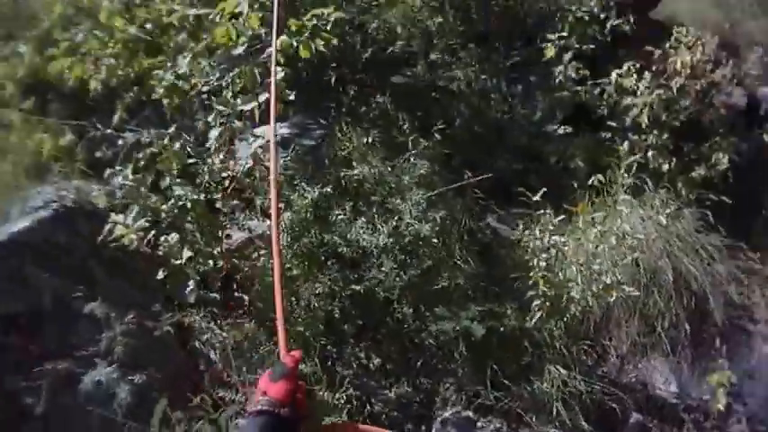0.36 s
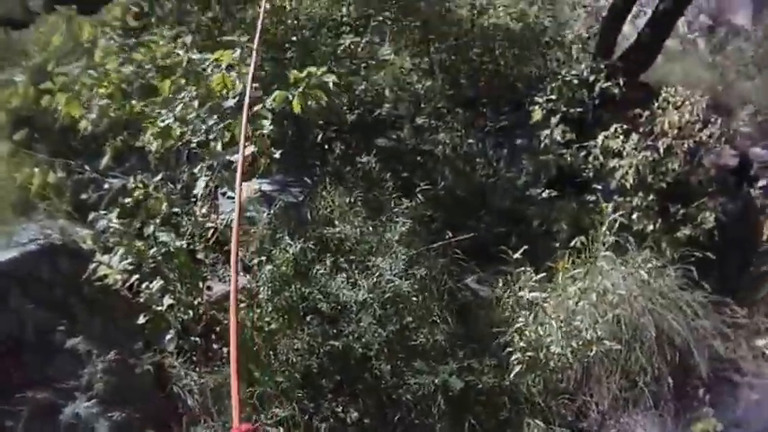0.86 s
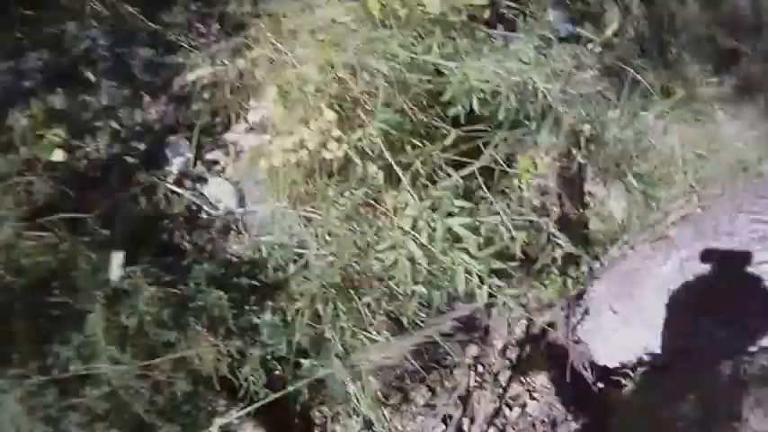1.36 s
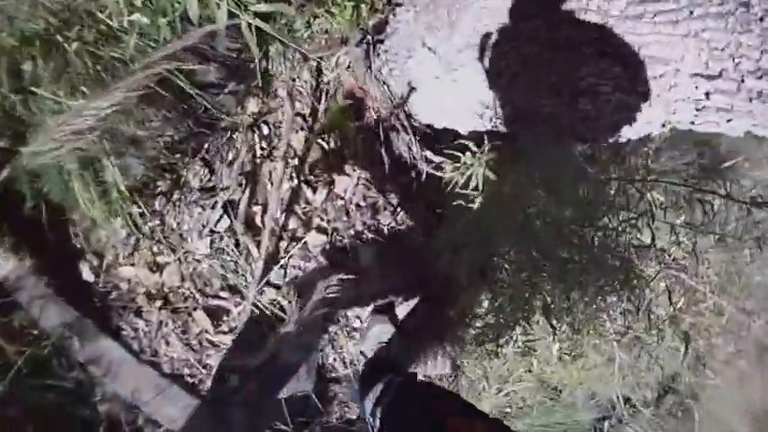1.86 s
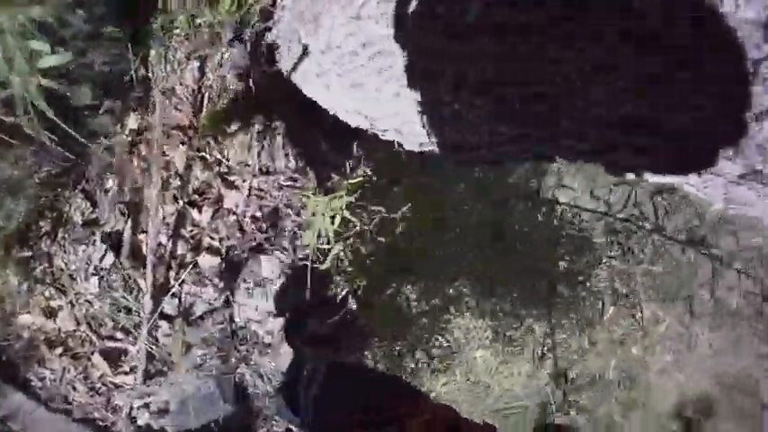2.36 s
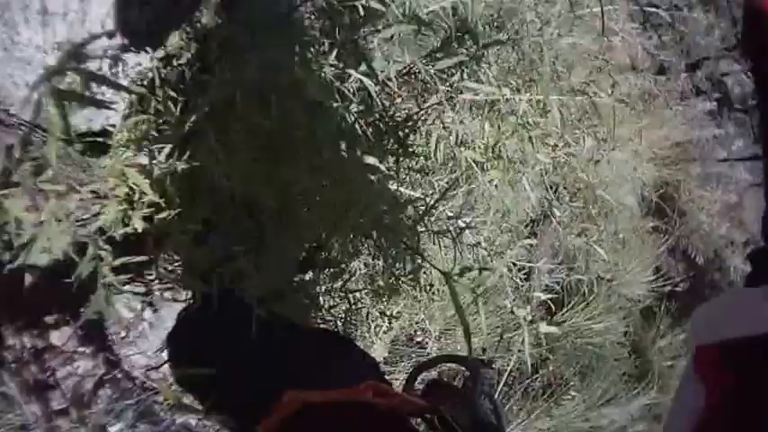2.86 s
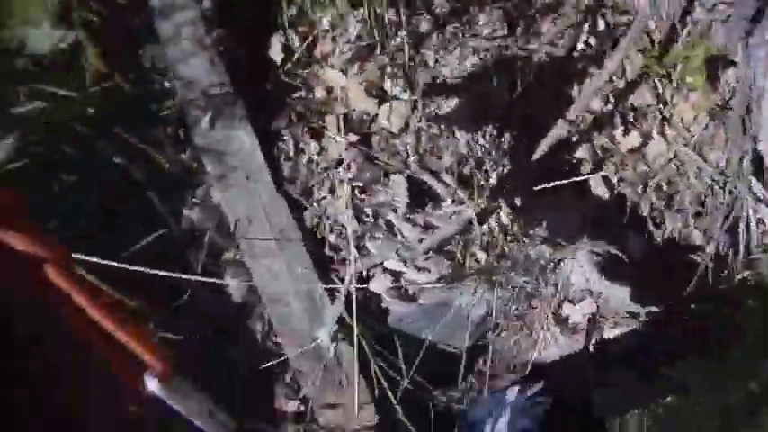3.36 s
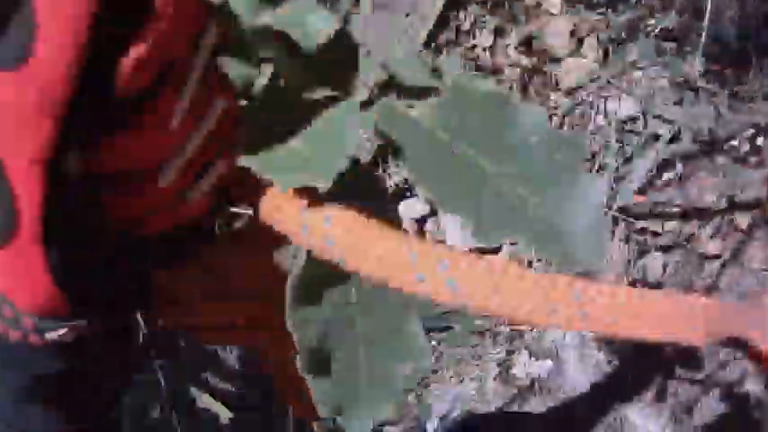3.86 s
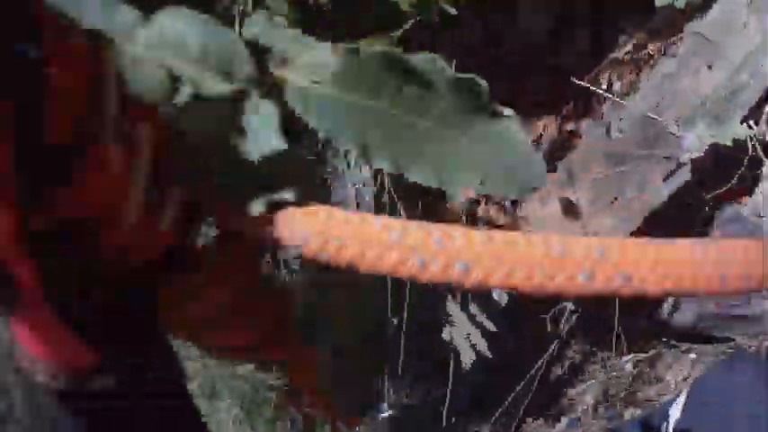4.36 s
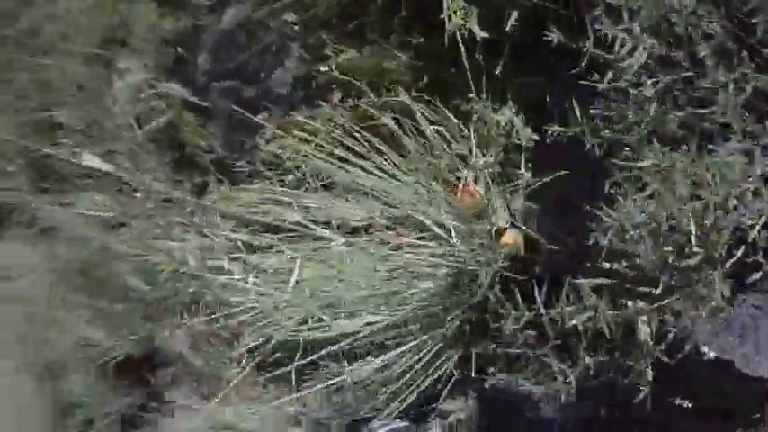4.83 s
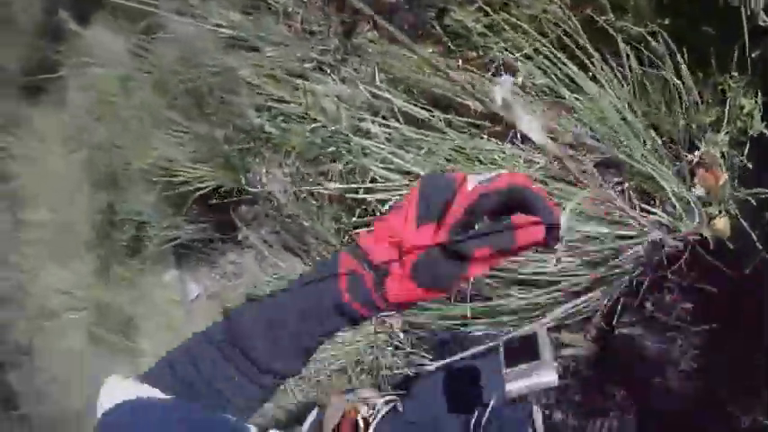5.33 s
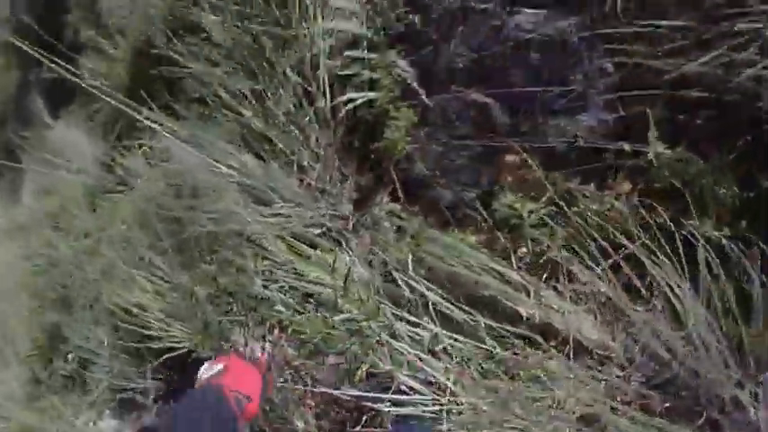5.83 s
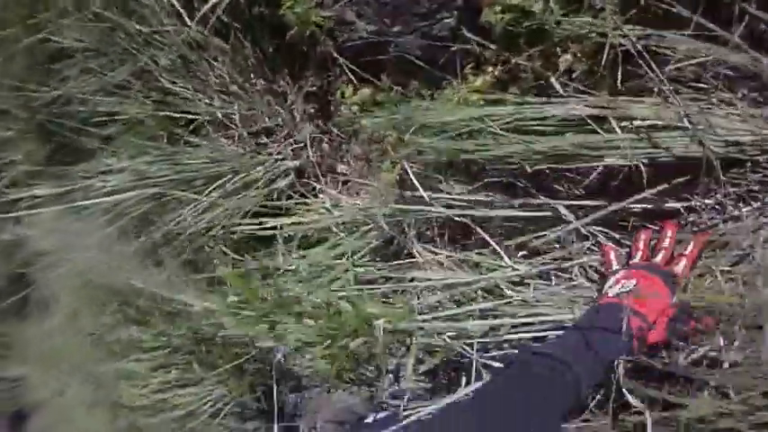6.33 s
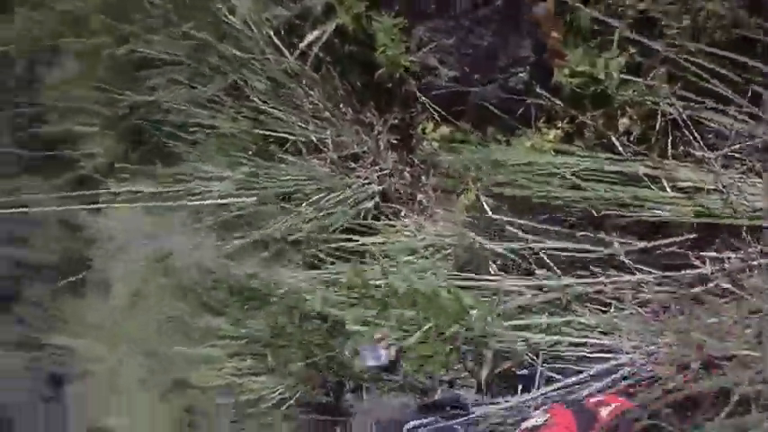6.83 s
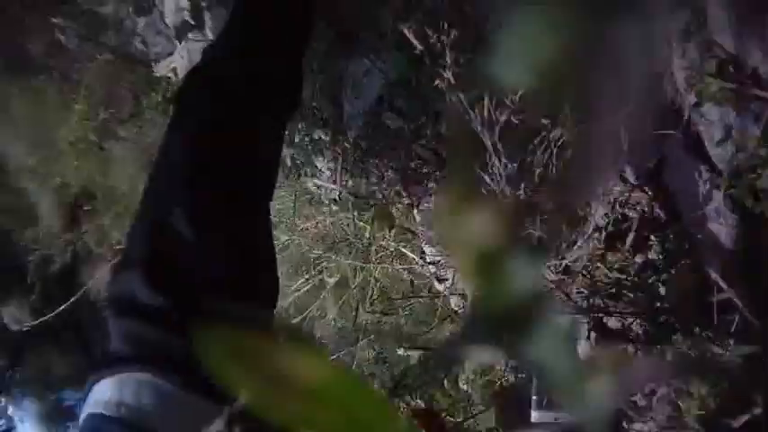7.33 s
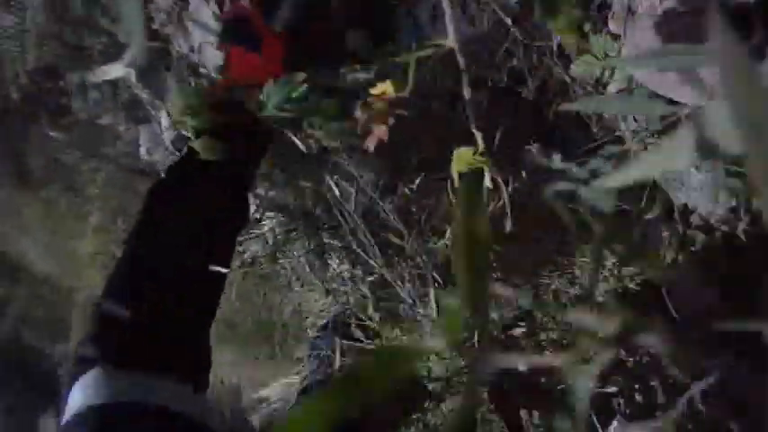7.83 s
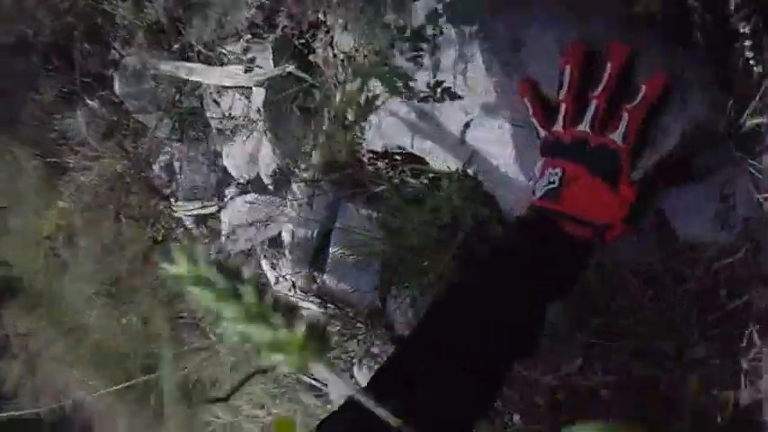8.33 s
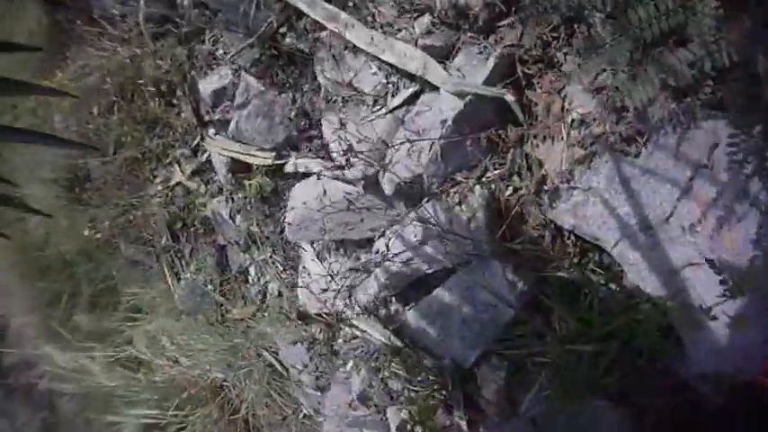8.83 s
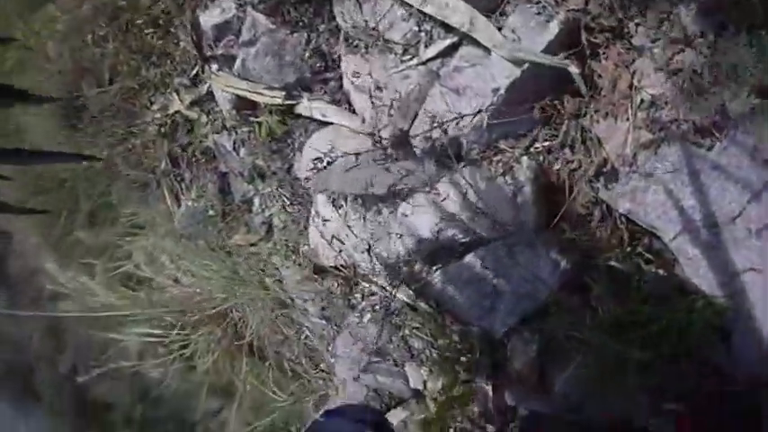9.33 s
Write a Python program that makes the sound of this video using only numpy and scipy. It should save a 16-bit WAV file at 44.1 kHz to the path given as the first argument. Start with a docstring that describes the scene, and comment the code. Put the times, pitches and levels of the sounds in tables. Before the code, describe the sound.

A helmet-mounted microphone outdoors among dry grass and brush, over a very faint hiss, thin high whine and insect trill. From 0 to 2.5 seconds it is quiet: light rustle, tiny ticks, soft hollow taps near 0.6, and a whip of stem with a knock at 1.5. Around 2.7 to 3.3, straps scuff, grass swishes and low wind bumps the microphone. At 4.1 to 4.6, twigs snap in a small cluster with shell knocks. A loud, sharp crack bursts at 5.6; a whip, knock and wind thump follow at 6.0, then grass swells near 6.6. Stems whip past at 7.1 to 7.2. From 7.4 to 8.25, stems drag roughly across the microphone with dull heavy knocks, crackles and brief squeals, climaxing in a piercing, overloaded snap at 8.2. After that, only a weak gust, few ticks and thinning rustle remain until about 9.4.

```python
"""Insects trill and a faint hiss and whine persist as a climber first rustles dry grass and knocks a helmet.
Then twigs snap in small clusters, straps scuff and gusts buffet the port of the helmet camera.
Later, stems whip past, squeal and drag over the port until the loudest snaps; thinning rustle ends the scene.
Stems are patchy noise and damped sines, the shell is a bank of decaying modes, the wind is low noise,
and the insects are narrow noise bands, one of them chopped into pulses."""
import sys
import numpy as np
from scipy import signal
from scipy.fft import rfft, irfft, next_fast_len
from scipy.io import wavfile
from scipy.ndimage import uniform_filter1d, map_coordinates

SR = 44100
rng = np.random.default_rng(int(sys.argv[2]) if len(sys.argv) > 2 else 0)


def wav_record(signal):
    """Record a signal, one row per channel, as 16-bit PCM in the file named by sys.argv[1]."""
    frames = np.transpose(np.atleast_2d(signal))
    bounded = np.clip(frames, -1, 1)
    # unit amplitude maps onto the largest positive 16-bit level
    quanta = np.round(bounded * 32767).astype(np.int16)
    wavfile.write(sys.argv[1], SR, quanta)


def volts(x):
    """Linear amplitude factor 10**(x/20) for a level x in dB, scalar or array-like."""
    e = np.asarray(x, float) / 20
    return 10 ** e


N = 416304

# distant leaves and hiss, spectrum: (frequency [Hz], relative density [dB per Hz])
QUIET_SPECTRUM = [(30, -5.5), (192, -10), (399, 0.5), (874, -5.5), (2360, -2.5), (5040, -12), (6890, -3.5),
                  (8720, -19), (12300, -9.5), (15500, -11)]
# bouts of the nearer insect: (full from [s], hold [s], level [dB])
INSECT_BOUTS = [(2.86, 0.17, -66), (3.5, 0.21, -66)]
# gusts on the port: (full from [s], hold [s], level [dB])
GUSTS = [(2.74, 0.15, -67.5), (3.2, 0.06, -64), (4.13, 0.076, -65), (6.035, 0.068, -53.5),
         (7.25, 0.14, -58), (7.45, 0.85, -70), (8.35, 0.33, -58)]
# wind turbulence at the port, spectrum: (frequency [Hz], relative density [dB per Hz])
BUFFET_SPECTRUM = [(22, -12), (60, -7), (130, -6.5), (300, -13.5), (450, -39)]
# modes of the helmet shell: (frequency [Hz], relative level [dB], free decay time T60 [s])
SHELL_MODES = [(388, 0, .16), (450, -3, .05), (522, 0, .3), (678, 0, .3), (772, 0, .22), (851, -4, .25),
               (930, -5, .17), (1130, -2, .15), (1238, -4, .4), (1346, -7, .26), (1453, 0, .18),
               (2250, 1, .13), (3047, -1, .08), (3480, -1, .1)]
# knocks on the helmet: (time [s], relative level [dB], struck pitch [Hz], share of free ring time [0-1])
KNOCKS = [(.604, -38, 684, 0.66), (.649, -35, 433, 0.7), (1.519, -29.5, 1195, 0.92),
          (1.794, -46.5, 388, 0.9), (1.982, -39, 390, 0.87), (2.826, -36, 600, 0.3),
          (2.896, -40, 403, 0.67), (3.003, -30.5, 1020, 0.12), (3.201, -33, 397, 0.33),
          (4.199, -32, 436, 1), (4.263, -25.5, 436, 0.92), (4.56, -27.5, 678, 0.18),
          (5.562, -28, 522, 0.38), (5.746, -42, 1202, 0.7), (6.031, -23, 512, 0.75), (6.125, -40.5, 522, 1),
          (6.993, -29, 522, 0.6), (7.128, -25.5, 766, 0.4), (7.17, -24.5, 523, 0.32),
          (7.561, -15, 730, 0.08), (7.595, -10, 469, 0.2), (7.781, -12.5, 785, 0.06),
          (8.318, -36.5, 777, 0.6)]
# scuffs of strap and cloth on the helmet: (full from [s], hold [s], level [dB])
SCUFFS = [(.45, 0.15, -63.5), (.98, 0.32, -74), (2.72, 0.26, -62), (3.2, 0.11, -56), (4.14, 0.24, -59),
          (4.4, 0.44, -66.5), (5.9, 0.29, -60.5), (6.3, 0.35, -63.5), (6.85, 0.4, -58.5), (7.42, 0.43, -52),
          (7.8, 0.43, -54.5)]
# rubbing strap, spectrum before the shell: (frequency [Hz], relative density [dB per Hz])
RUB_SPECTRUM = [(120, -9.5), (330, -5), (450, -3.5), (700, -9), (1000, -24), (1500, -10)]
# resonances of the camera case around the port: (centre [Hz], width [Hz], level [dB])
CASE_RESONANCES = [(2420, 400, 1), (3850, 900, 1)]
# squeals of a rubbing stem: (full from [s], hold [s], level [dB], pitch [Hz])
SQUEALS = [(6.698, 0.025, -52.5, 2802), (7.274, 0.017, -45.5, 2250), (7.508, .024, -28, 2887),
           (8.163, 0.02, -25.5, 2326)]
# ticks of dry blades: (time [s], level [dB])
TICKS = [(.15, -50), (0.211, -45.5), (0.274, -49), (1.087, -50.5), (1.23, -50), (1.927, -40.5),
         (2.128, -41.5), (2.511, -43.5), (2.581, -47.5), (2.784, -44.5), (3.0062, -45), (3.039, -45),
         (3.072, -41), (3.118, -44), (3.643, -43.5), (4.002, -36.5), (5.4162, -40), (6.2362, -39.5),
         (6.992, -35), (7.2724, -41), (7.502, -19.5), (7.609, -20), (7.634, -17), (7.659, -21.5),
         (7.692, -20), (8.0113, -23), (8.106, -21.5), (8.507, -48.5), (8.604, -42), (8.674, -50.5),
         (8.707, -43), (8.88, -50)]
# snaps of stems: (time [s], level [dB], squeak pitch [Hz], share of squeak against broad crack [0-1])
SNAPS = [(1.52, -28.5, 4080, 0.4), (3.3087, -34, 3700, 0.68), (4.107, -32, 3940, 0.6),
         (4.196, -30, 2440, 0.6), (4.242, -26.5, 2090, 0.7), (4.2496, -32, 2300, 0.85),
         (4.328, -30, 3700, 0.44), (4.452, -36, 1710, 0.85), (4.564, -28, 4050, 0.42),
         (5.566, -6, 3600, 0.52), (5.575, -17, 3970, 0.9), (5.579, -16.5, 3720, 0.82),
         (5.585, -21.5, 3675, 0.85), (5.841, -27, 3540, 0.44), (6.028, -24.5, 1190, 1),
         (6.0283, -26, 2250, 0.58), (7.118, -27, 2100, 0.9), (7.173, -19, 2620, 0.48), (7.42, -20, 3030, 1),
         (7.5926, -11.5, 3820, 0.92), (7.733, -15, 5000, 0.63), (7.742, -12.5, 2900, 0.06),
         (7.98, -23.5, 1570, 0.96), (8.0653, -14.5, 4020, 0.76), (8.207, -6.5, 3510, 0.87),
         (8.2098, -7.5, 3570, 0.99), (8.2218, -3.5, 3360, 1), (8.232, 2.5, 3543, 0.9),
         (8.241, -10, 3470, .8), (8.259, -28, 2710, .7), (8.2793, -30.5, 2860, .6),
         (8.3024, -34.5, 2686, 0.5), (8.3203, -32.5, 2860, 0.7)]
# stems in air, spectrum before the case: (frequency [Hz], relative density [dB per Hz])
RUSTLE_SPECTRUM = [(300, -11.5), (900, 2.5), (2000, -6), (4400, -7), (5200, -10.5), (7000, -4.5)]
# stems on the covered port, spectrum: (frequency [Hz], relative density [dB per Hz])
SCRAPE_SPECTRUM = [(300, -16.5), (1000, -6.5), (2000, -9.5), (3200, -4.5), (4500, -3), (7000, -14.5)]
# treble of the stems, spectrum: (frequency [Hz], relative density [dB per Hz])
FIZZ_SPECTRUM = [(4500, -7), (6500, -3), (10000, -6), (15500, -11.5)]
# how much the climber stirs the grass around: (time [s], rustle level [dB])
STIR = [(0, -65.5), (.9, -76), (1.45, -74.5), (1.7, -66), (3.45, -70), (4.0, -62.5), (4.35, -57.5),
        (4.9, -63.5), (6.24, -61), (6.55, -51.5), (6.8, -64.5), (7.3, -67), (8.4, -63.5), (9.44, -76)]
# swishes, a hand or arm sweeps through stems:
# (full from [s], hold [s], rustle level [dB], treble over rustle [dB])
SWISHES = [(1.712, 0.021, -61.5, -18), (1.815, 0.018, -57.5, -5), (2.717, 0.2, -63.5, -24),
           (3.05, 0.24, -54, -5), (4.123, 0.023, -49.5, -12), (4.211, 0.083, -46.5, -11),
           (5.834, 0.0081, -48, -8.5), (6.005, 0.14, -49, -7), (6.835, 0.16, -51, -5.5),
           (8.25, 0.0264, -45, -22), (8.74, 0.021, -59.5, -5), (9.191, 0.017, -59, -6)]
# flicks, a bent stem whips back past the port: (time [s], rustle level [dB], treble over rustle [dB])
FLICKS = [(0, -56, -1), (1.523, -37, -17.5), (4.1, -47, -8), (6.031, -31, -20), (7.121, -30.5, -14),
          (7.17, -28, -19), (7.271, -44.5, -25)]
# drags, stems slide on the port until they slip off; short ones are jerks, most of them within long ones:
# (full from [s], hold [s], scrape level [dB], treble over scrape [dB])
DRAGS = [(5.573, 0.014, -34, 5), (7.39, 0.375, -32, -8.5), (7.569, 0.03, -27, -6), (7.636, 0.016, -27, -8),
         (7.674, 0.035, -28.5, -8), (7.764, 0.5, -36, -7.5), (7.887, 0.058, -31.5, -7),
         (8.053, 0.027, -30.5, -3.5), (8.145, 0.032, -28.5, 0), (8.2, 0.052, -26.5, 1)]
DRAG_EDGE_DB_PER_S = 2999.5  # rise and fall of drags and squeals


def unit(x):
    """Normalisation to unit rms."""
    return x / np.sqrt(np.mean(x ** 2) + 1e-20)


def wobble(rate_hz):
    """Band-limited fluctuation: a smooth random curve with rate_hz knots a second."""
    knots = rng.standard_normal(int(N * rate_hz / SR) + 4)
    return map_coordinates(knots, [np.arange(N) * rate_hz / SR])


def filtered(x, response):
    """Linear filtering: the spectrum of x times a complex response of frequency."""
    m = next_fast_len(N + 8192)
    return irfft(rfft(x, m) * response(np.fft.rfftfreq(m, 1 / SR)), m)[:N]


def coloured(x, points):
    """Spectral shaping by (Hz, dB) points on a log frequency axis, closed beyond its ends, rms 1."""
    f, db = np.transpose(points)
    return unit(filtered(x, lambda hz: volts(np.interp(np.log(hz + 1), np.log(f), db, -120, -120))))


def resonance(hz, centre_hz, width_hz):
    """Response of a single damped resonator, 1 at its centre."""
    damping = 1j * hz * width_hz
    return damping / (centre_hz * centre_hz - hz * hz + damping)


def case(x):
    """Cavity resonance: the hollow in front of the port lifts broad bands."""
    def response(hz):
        return .33 + sum(volts(db) * resonance(hz, centre, width) for centre, width, db in CASE_RESONANCES)
    return filtered(x, response)


def thin(hz):
    """Small-source radiation: thin stems push no bass."""
    return (1j * hz / (900 + 1j * hz)) ** 2


def swell(s, hold_s, db, rise_db_per_s, fall_db_per_s):
    """Exponential growth and decay: a gain that climbs, holds and sinks at steady dB per second."""
    t = np.arange(N) / SR
    before_s, after_s = np.maximum(s - t, 0), np.maximum(t - s - hold_s, 0)
    return volts(db - rise_db_per_s * before_s - fall_db_per_s * after_s)


def swells(rows, rise_db_per_s, fall_db_per_s, rest_db):
    """Incoherent addition: the swells of all rows and a resting level add as powers."""
    power = sum(swell(*row, rise_db_per_s, fall_db_per_s) ** 2 for row in rows)
    return np.sqrt(volts(rest_db) ** 2 + power)


def floor():
    """Stationary background: shaped noise of distant leaves and hiss, and a pure tone of camera electronics."""
    whine = np.sqrt(2) * volts(-81) * np.sin(2 * np.pi * 11988 * np.arange(N) / SR)
    return volts(-68) * coloured(rng.standard_normal(N), QUIET_SPECTRUM) + whine


def insects():
    """Amplitude modulation: a narrow band chopped into fast pulses, over a lower band of farther singers."""
    t = np.arange(N) / SR
    pulses = np.maximum(np.sin(2 * np.pi * 42 * t + 1.4 * wobble(5.2)), 0) ** 1.3
    near = unit(pulses * coloured(rng.standard_normal(N), [(6700, -34), (7030, -2), (7350, -34.5)]))
    far = coloured(rng.standard_normal(N), [(5200, -19.5), (5800, -6), (6500, -23)])
    bouts = swells(INSECT_BOUTS, rise_db_per_s=82, fall_db_per_s=132, rest_db=-78.5)
    return bouts * near + volts(-78) * far


def wind():
    """Turbulent pressure: eddies thump the port at random, 80 a second on average, over a low roar."""
    thumps = (rng.random(N) < 80 / SR) * rng.uniform(-1, 1, N)
    roar = .8 * volts(2.2 * wobble(18)) * rng.standard_normal(N)
    gusts = swells(GUSTS, rise_db_per_s=219, fall_db_per_s=200, rest_db=-85.5)
    return gusts * coloured(unit(thumps) + roar, BUFFET_SPECTRUM)


def knocks():
    """Modal excitation: a blow rings the shell modes nearest in pitch; a stem left pressing damps the ring."""
    out, t = np.zeros(N + SR), np.arange(SR // 2) / SR
    hz, level_db, t60 = np.array(SHELL_MODES).T[:, :, None]
    for s, db, near_hz, free in KNOCKS:
        far_db = 9 + 11 * free  # a free shell sings nearer one note
        scatter_db = 1.6 * rng.standard_normal(hz.shape)
        octaves = np.abs(np.log2(hz / near_hz))
        reach_db = scatter_db - np.minimum(65 * (octaves - octaves.min()), far_db)
        decay_db = 60 * t / (t60 * max(free, .03))
        modes = np.sin(2 * np.pi * (hz * t + rng.random(hz.shape)))
        ring = np.sum(volts(level_db + reach_db - decay_db) * modes, axis=0)
        thud = volts(2 - 60 * t / (0.039 * np.sqrt(abs(free)))) * np.sin(2 * np.pi * near_hz * t)
        onset = 1 - np.exp(-t / 0.0012)
        out[round(s * SR):][:len(t)] += volts(db - 8) * (ring + thud) * onset
    return out[:N]


def strap(clumps_db):
    """Friction-driven resonance: uneven low scuffs partly ring the shell's modes."""
    uneven_db = np.minimum(1.6 * clumps_db + 2.5 * wobble(30), 6)
    scuff = volts(uneven_db) * rng.standard_normal(N)

    def shell(hz):
        return 1 + sum(2.2 * volts(db) * resonance(hz, centre, 25) for centre, db, _ in SHELL_MODES)
    rub = unit(filtered(coloured(scuff, RUB_SPECTRUM), shell))
    return swells(SCUFFS, rise_db_per_s=199, fall_db_per_s=205.5, rest_db=-74.5) * rub


def squeals():
    """Frictional oscillation: a stem rubbing on the case sings briefly on one unsteady pitch."""
    t = np.arange(N) / SR
    drift = np.cumsum(0.13 * rng.standard_normal(N))
    out = np.zeros(N)
    for s, hold_s, db, hz in SQUEALS:
        gain = swell(s, hold_s, db, DRAG_EDGE_DB_PER_S, DRAG_EDGE_DB_PER_S)
        out += gain * np.sin(2 * np.pi * hz * t + drift)
    return out


def ticks():
    """Impulsive excitation: each tick is a short broad noise click, lifted by the case."""
    level, t = np.zeros(N + SR), np.arange(SR // 20) / SR
    for s, db in TICKS:
        level[round(s * SR):][:len(t)] += volts(db - 60 * t / 0.016)  # T60 of 16 ms
    soft_noise = filtered(rng.standard_normal(N), lambda hz: 1 / (1 + 1j * hz / 6000))
    return filtered(level[:N] * unit(case(soft_noise)), thin)


def snaps(bright):
    """Fracture: a snap is a brief enveloped squeak at its pitch plus a sharp broad crack."""
    squeaks, cracks = np.zeros((2, N + SR))
    t = np.arange(SR // 8) / SR
    u = t / .0015
    bell = u ** 2 * np.exp(2 - 2 * u)  # peaks after 1.5 ms
    for s, db, hz, squeak in SNAPS:
        drift = np.cumsum(0.066 * rng.standard_normal(len(t)))  # phase noise widens the squeak
        at = slice(round(s * SR), round(s * SR) + len(t))
        squeaks[at] += squeak * volts(db) * bell * np.sin(2 * np.pi * hz * t + drift)
        cracks[at] += abs(1 - squeak) * volts(db - 60 * t / 0.015)
    body = unit(case(coloured(rng.standard_normal(N), RUSTLE_SPECTRUM)))
    broad = body + bright * coloured(rng.standard_normal(N), FIZZ_SPECTRUM)
    return filtered(squeaks[:N] + cracks[:N] * broad, thin)


def patchy(depth_db):
    """Random modulation: noise with louder and softer patches over time and pitch."""
    z = signal.stft(rng.standard_normal(N), nperseg=256)[2]
    field = uniform_filter1d(rng.standard_normal(z.shape), size=3, axis=0)  # over pitch
    field = uniform_filter1d(field, size=9, axis=1)  # over time
    return unit(signal.istft(z * volts(depth_db * unit(field)), nperseg=256)[1][:N])


def crackle(per_s, pitch_hz, spread, turns, spread_db):
    """Shot noise of cracking fibres: damped sines of scattered pitch and bounded size, a few turns long."""
    count, k = round(per_s * N / SR), np.arange(160)
    place, chance, phase = rng.random((3, count, 1))
    pitch_pick, turns_pick = rng.standard_normal((2, count, 1))
    hz = np.clip(pitch_hz * np.exp(spread * pitch_pick), 200, 15000)
    cycles = hz * k / SR / (turns * np.exp(.5 * turns_pick))
    size = volts(spread_db * np.minimum(-np.log(chance), 3))
    grain = size * cycles * np.exp(-2 * cycles) * np.sin(2 * np.pi * (hz * k / SR + phase))
    at = (place * N).astype(int) + k
    return unit(np.bincount(at.ravel(), grain.ravel(), N + 160)[:N])


def contact():
    """Power addition: gains of rustle, scrape and treble fizz from all stem movements together."""
    flicks = [(s, 0, db, treble_db) for s, db, treble_db in FLICKS]
    # (body row: 0 rustle or 1 scrape, movements, rise [dB/s], fall [dB/s])
    kinds = [(0, SWISHES, 250.5, 130), (0, flicks, 4998.5, 493),
             (1, DRAGS, DRAG_EDGE_DB_PER_S, DRAG_EDGE_DB_PER_S)]
    stir_s, stir_db = np.transpose(STIR)
    stir = volts(np.interp(np.arange(N) / SR, stir_s, stir_db)) ** 2
    body = np.array([stir, 0 * stir])
    treble = stir * volts(-5.5) ** 2  # treble over rustle; stems nearer the port are brighter
    for row, movements, rise, fall in kinds:
        for s, hold_s, db, treble_db in movements:
            power = swell(s, hold_s, db, rise, fall) ** 2
            body[row] += power
            treble += power * volts(treble_db) ** 2
    return np.sqrt(body), np.sqrt(treble)


def brush(level, pressed, treble):
    """Sliding friction: stems hiss in patches and crack in clumps that also jerk the strap on the shell."""
    clumps_db = 1.3 * wobble(40) + 1.9 * wobble(130)
    cracks = crackle(per_s=600, pitch_hz=3200, spread=.35, turns=1.4, spread_db=4)
    rustle = unit(case(coloured(patchy(depth_db=2.8) + .5 * cracks, RUSTLE_SPECTRUM)))
    grit = crackle(per_s=1500, pitch_hz=3340, spread=.4, turns=1.5, spread_db=3.5)
    scrape = coloured(patchy(depth_db=2.2) + .6 * grit, SCRAPE_SPECTRUM)
    sparks = crackle(per_s=400, pitch_hz=8500, spread=.4, turns=1.1, spread_db=3.5)
    fizz = coloured(patchy(depth_db=2.8) + .45 * sparks, FIZZ_SPECTRUM)
    body = level * unit(volts(clumps_db)) * rustle
    scrape_and_fizz = unit(volts(.8 * clumps_db)) * (pressed * scrape + treble * fizz)
    return body + scrape_and_fizz + strap(clumps_db)


def scene():
    """Superposition: all sources add at the single port."""
    (level, pressed), treble = contact()
    bright = treble / np.hypot(level, pressed)
    background = floor() + insects() + wind()
    strikes = knocks() + squeals() + ticks() + snaps(bright)
    return (background + strikes + brush(level, pressed, treble))[None]


def band_limit(x):
    """A steep low-pass at the top of the band."""
    return signal.sosfilt(signal.butter(12, 16460, fs=SR, output="sos"), x)


def record(dry):
    """Saturation and band limiting: peaks clip at full scale, then the microphone keeps its band."""
    low_hz, top_hz = 28, 15700
    clipped = np.clip(dry[0], -1, 1)
    kept = filtered(clipped, lambda hz: (hz < top_hz) * 1j * hz / (low_hz + 1j * hz))
    return band_limit(kept[None])


dry = scene()
out = record(dry)
wav_record(out)
```